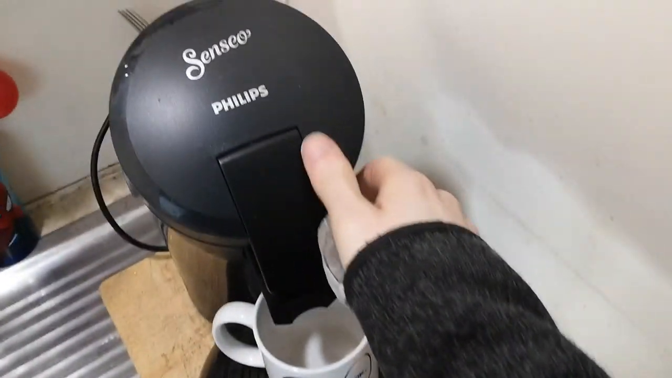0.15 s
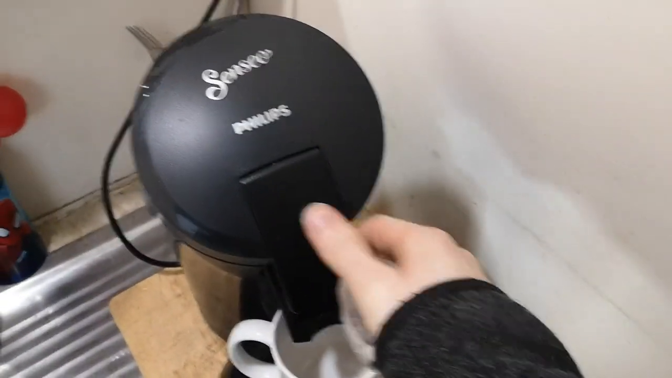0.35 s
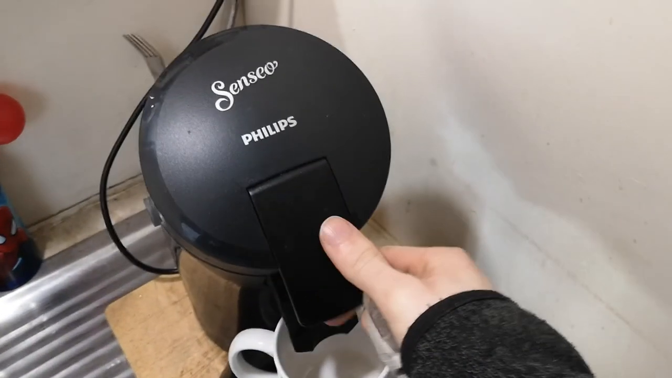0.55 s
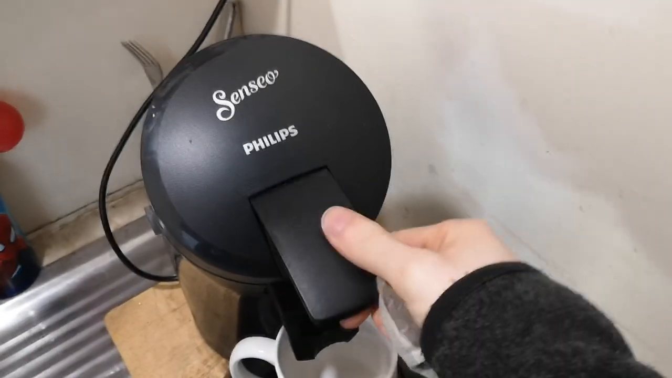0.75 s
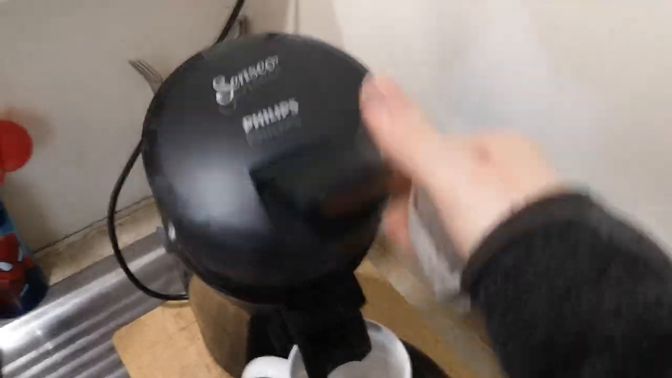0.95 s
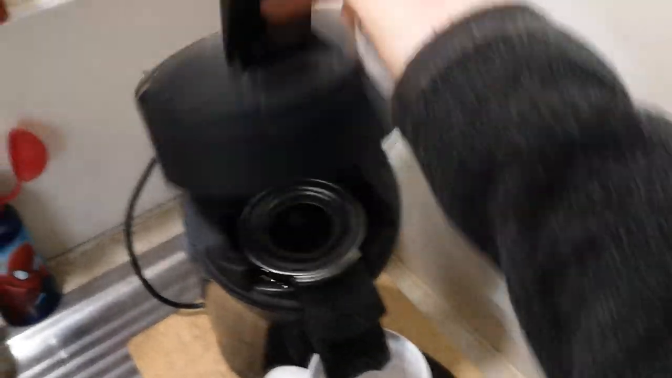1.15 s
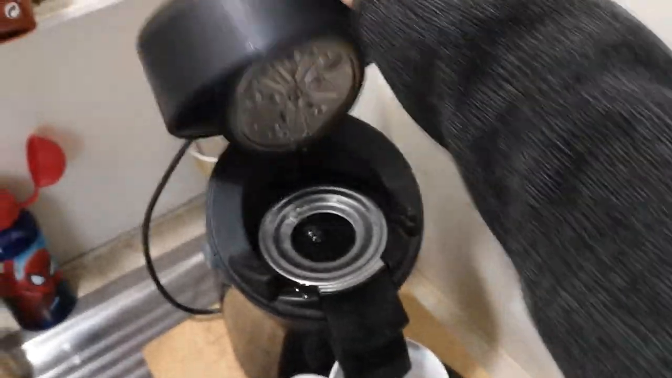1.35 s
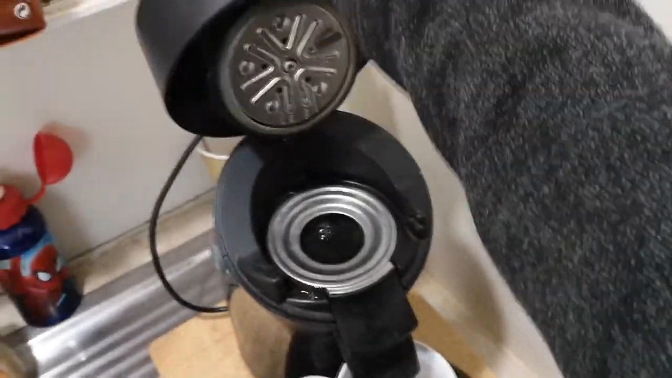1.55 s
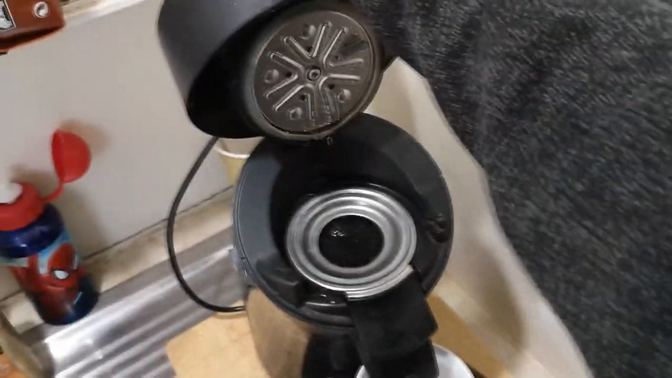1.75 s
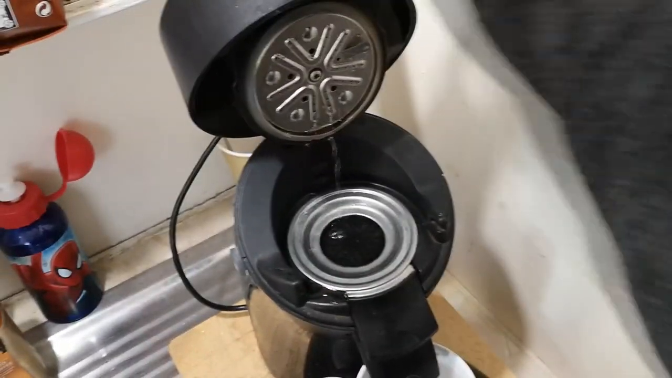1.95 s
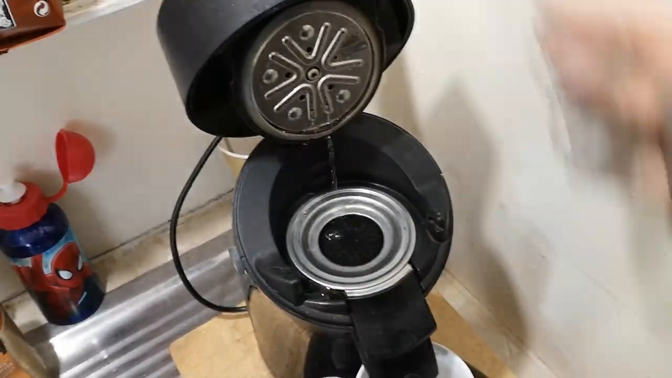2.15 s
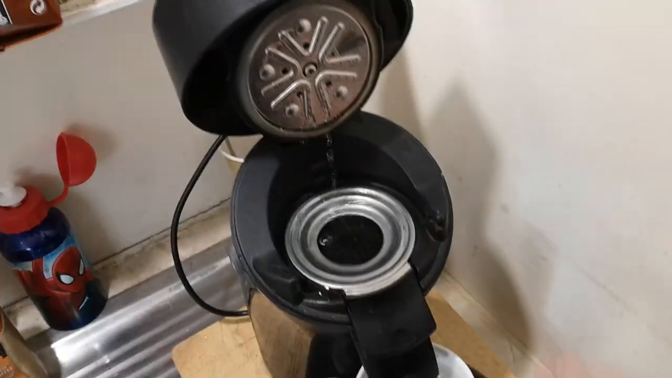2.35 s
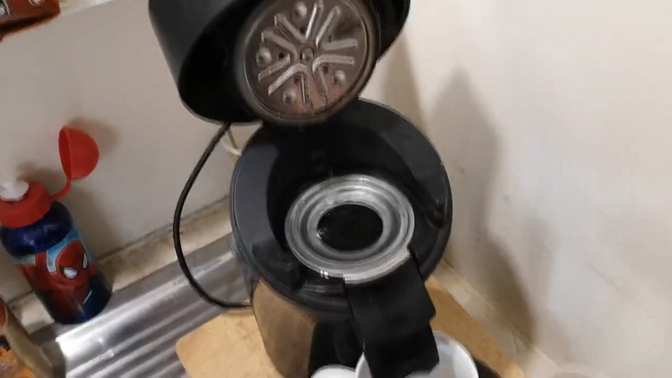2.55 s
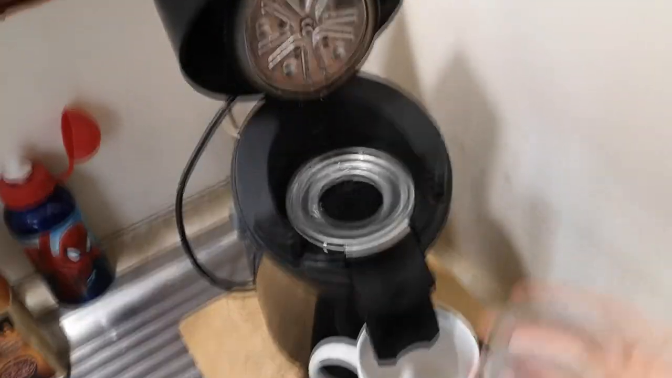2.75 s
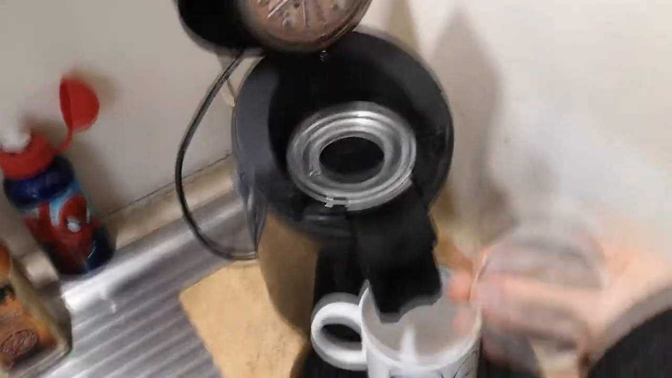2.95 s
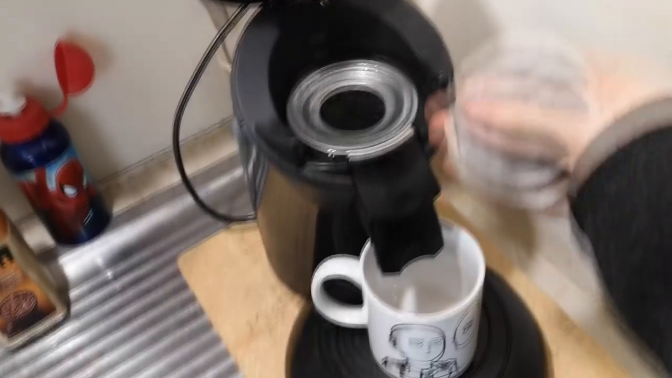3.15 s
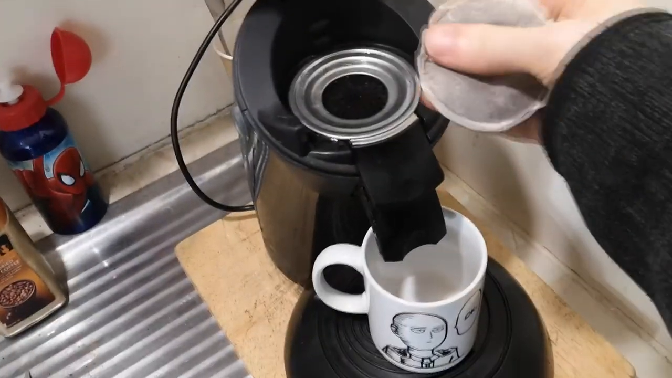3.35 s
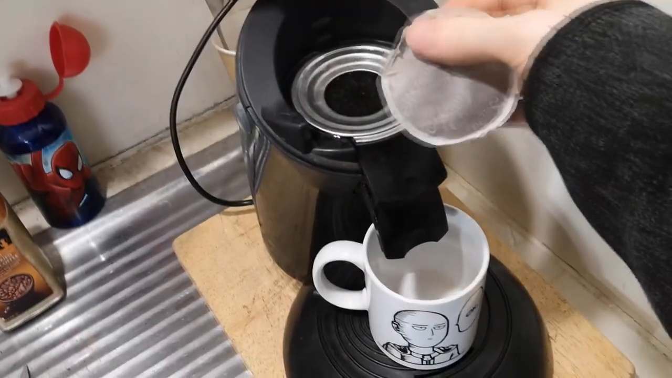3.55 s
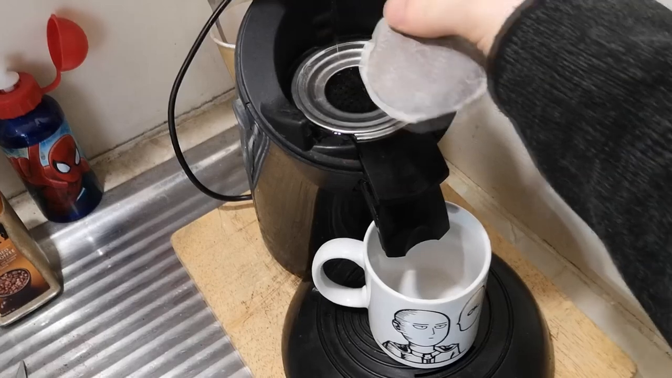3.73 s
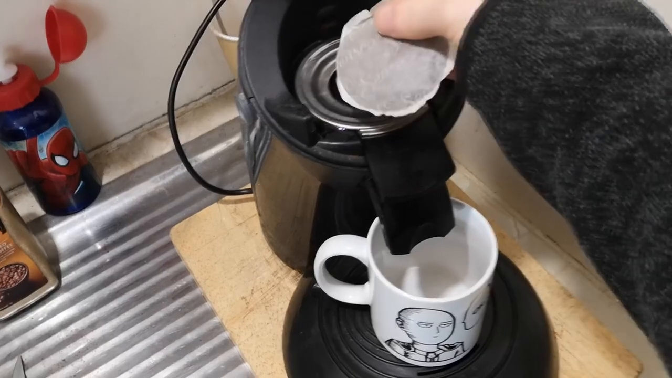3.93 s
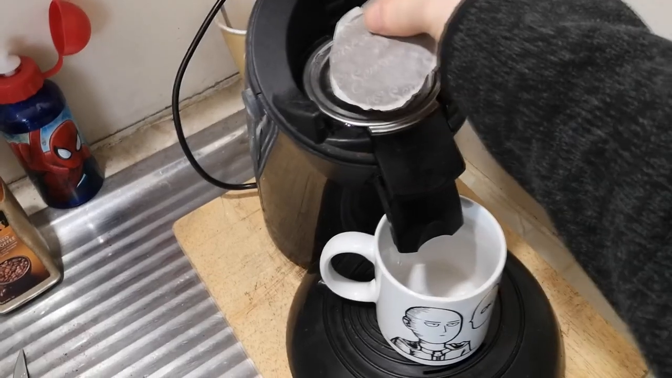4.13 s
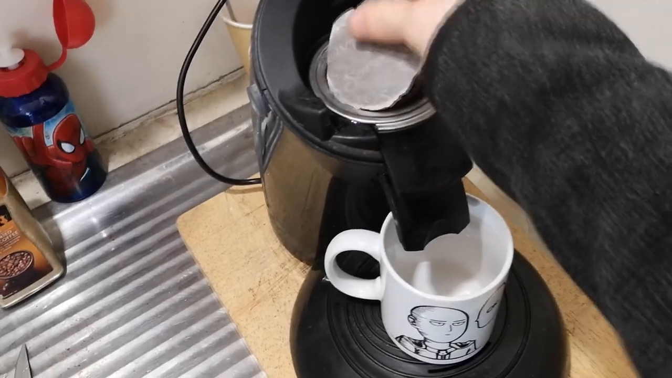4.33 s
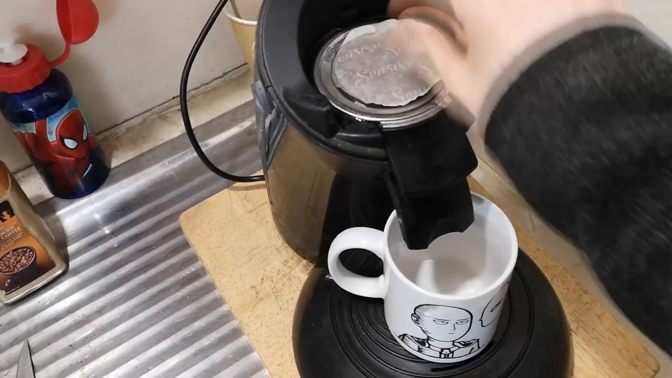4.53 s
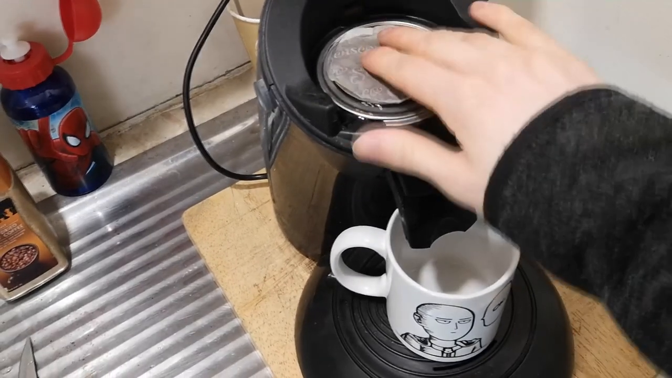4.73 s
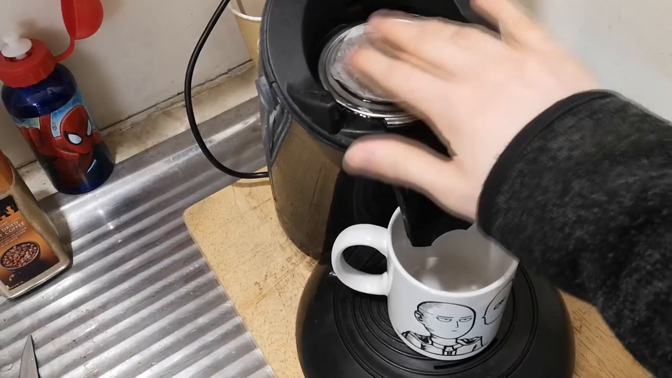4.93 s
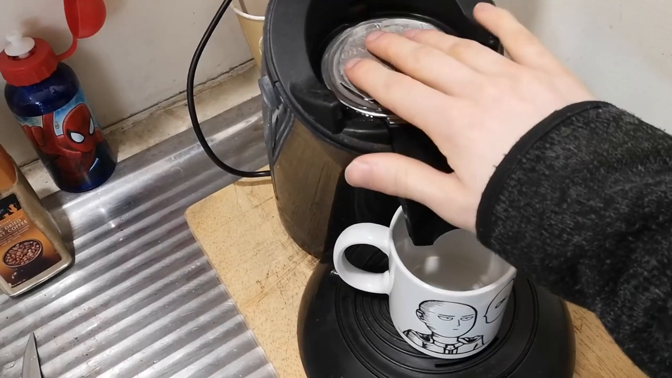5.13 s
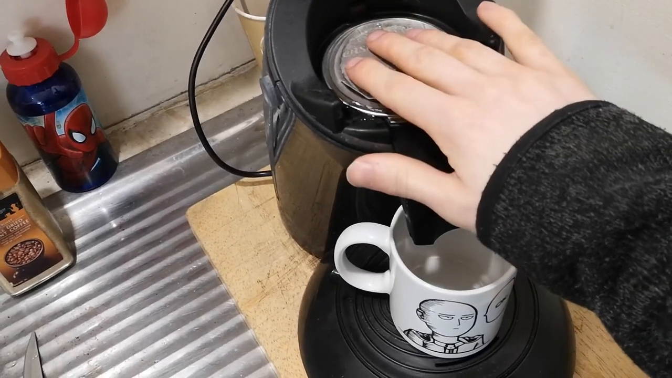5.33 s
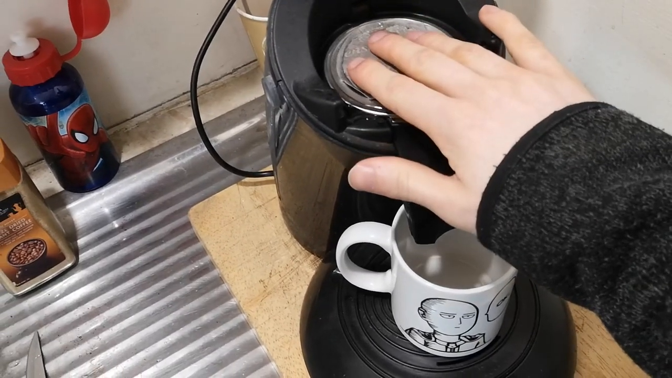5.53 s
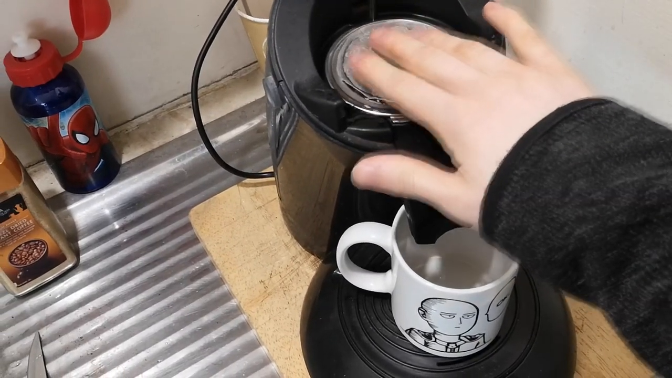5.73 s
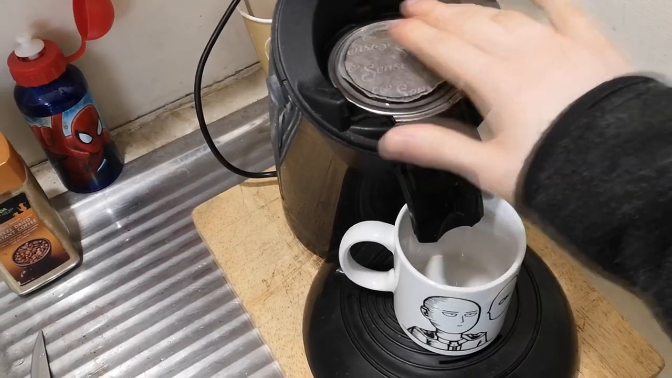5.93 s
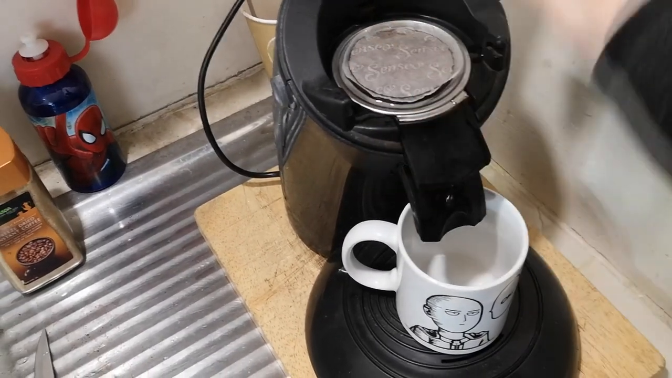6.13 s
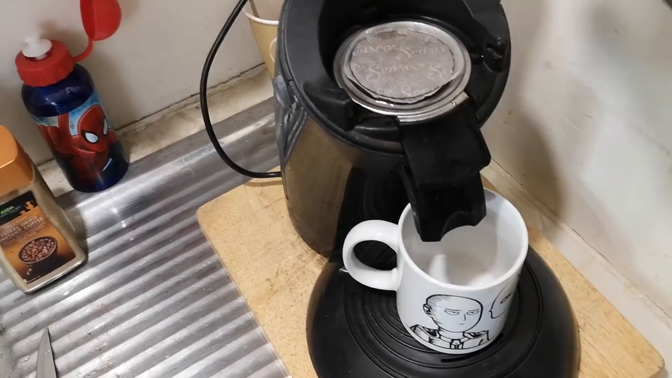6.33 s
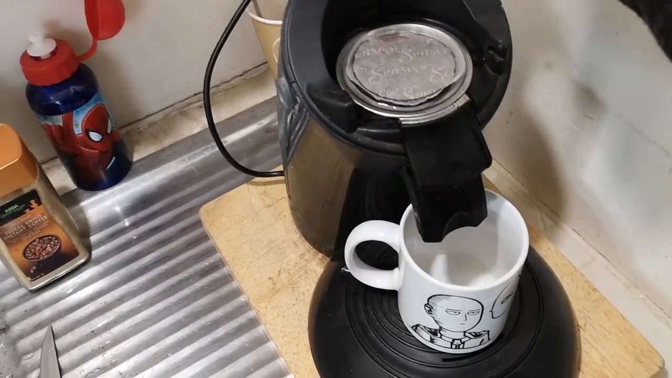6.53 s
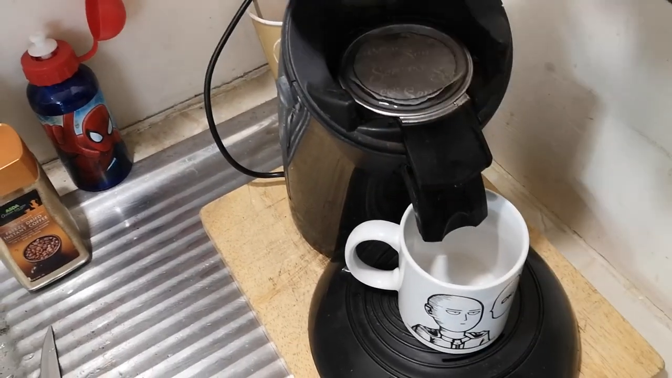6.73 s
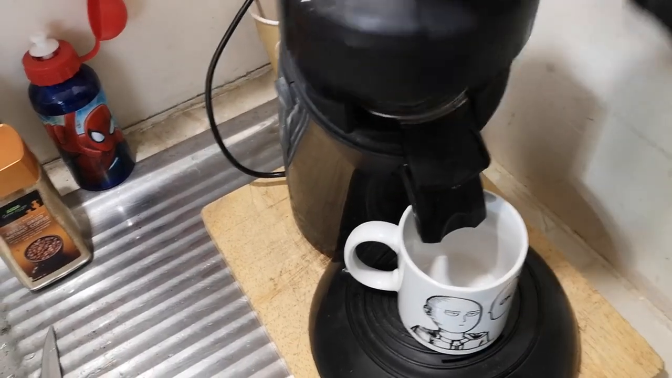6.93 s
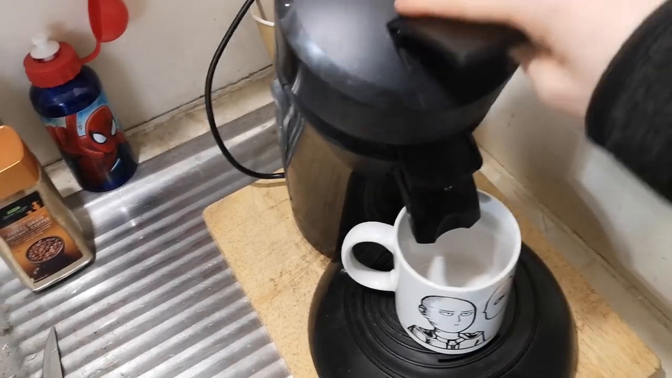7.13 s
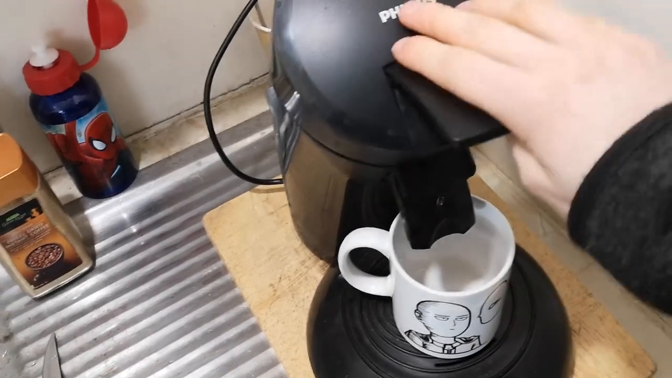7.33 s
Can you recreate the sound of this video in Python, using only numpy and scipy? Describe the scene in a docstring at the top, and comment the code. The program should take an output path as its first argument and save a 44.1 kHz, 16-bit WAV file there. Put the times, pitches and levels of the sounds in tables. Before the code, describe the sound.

Sharp plastic clack and low thump, faint paper rustles, a deep wavering drone, then a rapid run of lid clicks and bumps in a small kitchen.

```python
"""Plastic clicks and low bumps stand over a swelling room noise and a deep wavering drone.
A hand works the lever and lid of a plastic coffee machine in a small kitchen and seats a paper pad.
Clicks are noise bursts ringing in plastic, bumps and drone are sines, creaks a driven resonance,
rustle dense snaps, and the room is random spectra. Of a hand-held pair of microphone ports
the left is nearer and brighter."""
import sys
import numpy as np
from scipy import signal
from scipy.fft import rfft, irfft
from scipy.io import wavfile
from scipy.ndimage import uniform_filter1d

SR = 44100
rng = np.random.default_rng(int(sys.argv[2]) if len(sys.argv) > 2 else 0)


def unload_wav(signal):
    """Save mono or channel-first audio to the path in sys.argv[1] as 16-bit WAV at rate SR, clipped to [-1, 1]."""
    wavfile.write(
        sys.argv[1],
        SR,
        np.round(np.clip(np.atleast_2d(signal).T, -1, 1) * 32767).astype(np.int16),
    )


N = 329868

LAG_S = 0.000591  # the right port hears the middle and treble later
BASS_LAG_S = 0.00016  # the right port's delay for bumps and drone


def gain_of(db):
    """Amplitude factor of a level in dB."""
    return 10 ** (np.asarray(db) / 20)


def evened(x):
    """Scale to an RMS of one."""
    return x / np.sqrt(np.mean(abs(x) ** 2) + 1e-20)


def read(points, hz):
    """Read a curve of (f/Hz, value) points along log frequency."""
    f, value = np.transpose(points)
    return np.interp(np.log(hz + 1), np.log(f + 1), value)


def add(mix, s, sound):
    """Lay a sound into the mix from s seconds on, cut at the end."""
    part = mix[..., round(s * SR):][..., :sound.shape[-1]]
    part += sound[..., :part.shape[-1]]


def bell(hz, centre_hz, width_hz):
    """Resonance curve that peaks at one and is half as high at the edges of its width."""
    return 1 / (1 + (2 * (hz - centre_hz) / width_hz) ** 2)


def late(hz):
    """Phase turn of the right port: deep bass arrives together, the rest later."""
    return np.exp(-2j * np.pi * hz * LAG_S * hz ** 2 / (hz ** 2 + 350 ** 2))


def ported(near, far, hz, pan_db, direct):
    """Spectra at both ports: the right hears the direct part late, the rest by other paths."""
    # how far near sources lean to the left: f/Hz, share of their left-right dB
    lean = [(200, -0.5), (700, .5), (1300, 0.9), (2200, 1.33), (4400, 0.8), (9000, 0.9), (14000, -0.1)]
    shared_hz = 370  # the bass share moves half way to fully direct here, and further below
    direct = np.clip(direct + (1 - direct) * bell(hz, 0, 2 * shared_hz), 0, 1)
    right = direct * near * late(hz) + np.sqrt(1 - direct ** 2) * far
    right = right / gain_of(pan_db * np.clip(read(lean, hz), 0, 1.5))
    return np.array([near, right])


def strokes(rows):
    """Gain of each stroke over the whole scene: a swell up to its loudest moment, then a fade."""
    range_db = 20  # a swell or fade length is the time taken to cover this range
    s, db, swell_s, fade_s = np.transpose(rows)[:4, :, None]
    since = np.arange(N) / SR - s
    return gain_of(db - range_db * np.where(since < 0, -since / swell_s, since / fade_s))


def room_noise(patchy_db=1.0, flicker_db=1.8):
    """Random short-time spectra; rumble, body and hiss swell, the zones between follow the body."""
    # swells of the room noise: t/s, rumble level/dB, body level/dB, hiss level/dB
    swells = [(0.0, -60, -59, -71.5), (0.25, -55.5, -59.5, -70.5), (0.62, -50.5, -58.5, -73),
              (0.82, -45, -47.5, -63), (1.0, -43, -55.5, -69), (1.18, -48, -55.5, -69),
              (1.37, -48.5, -56, -68), (1.85, -49.5, -61, -75), (2.25, -48.5, -57, -67),
              (2.6, -47.5, -55, -72), (2.85, -51.5, -59, -73.5), (3.4, -51.5, -59.5, -71),
              (3.98, -48.5, -59.5, -74.5), (4.3, -44, -54, -71), (4.621, -41.5, -55, -69),
              (4.899, -52.5, -61.5, -76.5), (5.25, -51, -60, -75.5), (5.58, -47, -58, -74.5),
              (5.85, -39.5, -54.5, -70.5), (6.2, -43.5, -56, -66), (6.62, -59, -63, -77.5),
              (6.88, -30.5, -54.5, -63.5), (7.08, -59, -62.5, -77), (7.33, -36, -62, -77.5),
              (7.48, -59, -62.5, -70)]
    # spectrum shape within each zone: f/Hz, density/dB per Hz
    room = [(15, -3), (24, -1.5), (34, -6.5), (52, -4), (70, -6), (125, -17.5), (175, -25), (230, -21),
            (440, -24.5), (500, -31.5), (640, -28), (900, -33.5), (1300, -37), (2000, -34.5), (2700, -37.5),
            (3100, -47.5), (5500, -54.5), (9000, -63.5), (14200, -65), (16000, -80)]
    # resonances of the room noise: f/Hz, width/Hz, level above its spectrum/dB
    hollows = [(79, 15, -5), (100, 11, 4.5), (120, 10, -9), (141, 11, 2), (169, 24, 0), (229, 20.3, 9.5),
               (266, 11, -4.5), (284, 11, 5.5), (358.7, 21, 7.5), (383.3, 19.5, 8), (435, 26, 6),
               (541, 13, 10.5), (688, 16, 5.5), (849, 14, 15.5), (1101, 29, 6), (1282, 16.4, 13.5),
               (1790, 70, 6), (2120, 34, 4), (3516, 67, 11)]
    # brightness of the left port over the right: f/Hz, left-right/dB
    ports = [(100, 0), (380, 0), (700, 4.5), (1290, 6), (2380, 10), (4400, 5), (8120, 2), (15000, -1.5)]
    # likeness of the noise at both ports: f/Hz, correlation
    same_at = [(30, 1), (100, 0.98), (200, 1), (350, 0.85), (700, 0.37), (1500, 0.32), (3500, 0.12),
               (8000, 0.06), (14000, 0.15)]
    hum_db, hum_follows = -56.5, 0.85  # level when the body rests, dB per dB that the body swells
    low_middle_db, low_middle_follows = -68, 0.93
    body_rest_db = -60
    step, size = 512, 4096  # samples
    frames, hz = N // step + 9, np.fft.rfftfreq(size, 1 / SR)
    a, b, c, d, patches = rng.standard_normal((frames, len(hz), 5)).T

    # slow uneven patches over the whole field, quick flicker in the treble
    patches = uniform_filter1d(patches, size=40, axis=0)
    patches = evened(uniform_filter1d(patches, size=6, axis=1))
    flicker = evened(uniform_filter1d(rng.standard_normal(frames), size=2))
    shape_db = read(room, hz) + sum(db * bell(hz, f, w) for f, w, db in hollows)

    s, rumble, body, hiss = np.transpose(swells)
    swell = body - body_rest_db
    hum = hum_db + hum_follows * swell
    low_middle = low_middle_db + low_middle_follows * swell
    levels = [rumble, hum, low_middle, body, hiss]
    t, field_db = np.arange(frames) * step / SR, 0
    edges = [(0, 130), (150, 500), (520, 900), (900, 3000), (4000, 13000)]  # Hz, where each level is set
    knots = np.log([90, 170, 450, 540, 850, 1050, 2800, 5000])  # the zones crossfade between these
    for k, ((lo, hi), db) in enumerate(zip(edges, levels)):
        zone = np.interp(np.log(hz + 1), knots, np.array([0, 1, 1, 2, 2, 3, 3, 4]) == k)
        zone_db = 10 * np.log10(np.sum(gain_of(shape_db[(hz > lo) & (hz < hi)]) ** 2))
        field_db = field_db + zone[:, None] * (np.interp(t, s, db) - zone_db)
    field_db = field_db + shape_db[:, None] + patchy_db * patches
    field_db = field_db + flicker_db * flicker * (hz > 900)[:, None]

    same = np.clip(read(same_at, hz), -1, 1)[:, None]
    left = a + 1j * b
    right = same * left * late(hz)[:, None] + np.sqrt(1 - same ** 2) * (c + 1j * d)
    side = gain_of(read(ports, hz) / 2)[:, None]
    # eight overlapping frames average the power to a third
    z = np.array([left * side, right / side]) * gain_of(field_db) * np.sqrt(3)
    return signal.istft(z, nperseg=size, noverlap=size - step)[1][:, :N]


def drone():
    """Near-pure deep tones that swell, drift and fade."""
    # the deep drone, one table a swell: t/s, f/Hz, RMS level/dB
    deep = [
        [(0.1, 66.4, -62), (0.3, 64.7, -58), (0.5, 61.6, -51), (0.75, 60, -56)],
        [(2.1, 38.3, -60), (2.3, 40.2, -48), (2.39, 40.7, -40), (2.49, 40, -34), (2.64, 44.3, -46),
         (2.79, 45.2, -52)],
        [(3.0, 47, -64), (3.1, 46.3, -42.5), (3.14, 47, -58), (3.2, 47.4, -43), (3.33, 48.4, -53.5),
         (3.46, 48, -55), (3.6, 52, -50)],
        [(3.85, 50.4, -48), (3.97, 45.9, -44.5), (4.11, 41.9, -33.5), (4.18, 41.6, -37), (4.3, 42.7, -29.5),
         (4.42, 41.4, -30), (4.6, 43.1, -31), (4.73, 43, -39), (4.79, 46.4, -64), (4.88, 46.3, -43.5),
         (5.05, 44.9, -55)],
        [(5.42, 54.3, -64), (5.52, 56.5, -39), (5.66, 54, -33), (5.8, 58.2, -34.5), (6.03, 60.5, -28.5),
         (6.12, 61.4, -35.5), (6.17, 61.2, -32), (6.28, 62.6, -44.5), (6.35, 59, -32), (6.42, 62.2, -43),
         (6.49, 62.8, -39), (6.63, 59.7, -45), (6.68, 62.7, -58)],
    ]
    # a second, higher drone, one table a swell: t/s, f/Hz, RMS level/dB
    higher = [
        [(1.95, 99.8, -68), (2.15, 96.3, -52.5), (2.4, 95, -55), (2.6, 94, -58), (2.8, 91.5, -56)],
        [(5.5, 110, -47), (5.69, 103.9, -63), (5.74, 103, -39.5), (5.95, 102.9, -43.5), (6.05, 103.8, -57),
         (6.13, 102.7, -48), (6.18, 103.7, -39), (6.3, 105.1, -56.5), (6.55, 100, -51), (6.7, 100.2, -60)],
    ]
    out = np.zeros(N)
    for rows in list(deep) + list(higher):
        s, hz, db = np.transpose(rows)
        t = np.arange(s[0], s[-1], 1 / SR)
        turns = np.cumsum(np.interp(t, s, hz)) / SR + rng.random()
        tone = np.sqrt(2) * gain_of(np.interp(t, s, db)) * np.sin(2 * np.pi * turns)
        add(out, s[0], tone * signal.windows.tukey(len(t), .08))
    return out


def clicks(width_hz=330, rise_s=0.001298, direct=0.057):
    """A short crack and a dying rustle of reflections, coloured by plastic that rings near one pitch."""
    # plastic clicks: t/s, peak/dB, ring f/Hz, ring strength/dB, nominal shares of body, treble
    # and top/dB, reflections/dB, left-right/dB before the lean
    hits = [(0.356, -41.5, 1580, 6, -29, -24, -47, -12, 9.9),
            (0.549, -27.5, 2170, 12, -39, -33, -51, -13.5, 6.8),
            (0.679, -38.5, 1790, 3.6, 6, -13, -46, 8, 9.7), (0.735, -29, 1650, 5.2, -40, -19, -66, -17, 12),
            (0.758, -36.5, 1860, 9, -28, -24, -49, -15, 11),
            (0.822, -8.5, 1660, 10, -38, -26.5, -43, -9, 11.6),
            (0.838, -15, 2110, 20, -20, -22, -36, -5, 3), (0.845, -23, 1740, 20, -11, -21, -40, -10, 18),
            (0.859, -19, 1790, 12, -35, -21.5, -42, -3, 10), (0.866, -30, 1560, 8, -18, -21, -30, -18, 9),
            (0.882, -24, 1670, 18, -18, -25, -48, -9, 5), (0.899, -34, 900, 12, 20, -26, -46, -3, 2),
            (1.097, -43, 1270, 6, -28, -13.5, -25.5, -7, 9.9),
            (1.217, -33, 2380, 9, -12, -4.5, -14.5, -9.5, 12),
            (1.473, -42.5, 1970, 17, -16, -17, -29, -9, 8),
            (1.508, -36, 2100, 11, -13, -11.5, -23, -23, 11), (2.131, -44, 1850, 9, -15, -11, -18, -15, 10),
            (2.155, -43.5, 1680, 4, 11, -3, -15, -3, 11), (2.213, -47, 1820, 13, -9, -6, -14, -17, 7),
            (2.43, -49, 1840, 7, -22, -17, -15, -19, 4), (2.517, -49, 2190, 9, -16, -14, -18, -16, 7),
            (2.565, -36, 2350, 12, -35, -3, -22, -18, 8.9),
            (2.641, -33.5, 1260, 20, -27, -23, -34, -4, 4.7),
            (2.655, -41, 1865, 2.3333, -34, -15, -39, 0, 5), (2.869, -42, 2110, 4, -34, -12, -17, -11, 7),
            (2.99, -50, 1740, 5, -20, -12, -25, -13, 4), (3.259, -46, 1880, 17, -34, -17, -32, -15, 7),
            (3.407, -43, 1790, 13, -16, -15, -23, -7, 12), (3.812, -51, 1610, 12, -24, -4, -16, -18, 7),
            (4.397, -26.5, 1890, 27, -38, -37, -51, 0, 13), (4.72, -40, 2150, 7.8, -31, -28, -44, -4, 6.5),
            (4.987, -48.5, 1720, 19, -23, -15, -29, -16, 5), (5.133, -41, 1880, 9, -30, -36, -46, -5, 9.2),
            (5.268, -51, 1690, 11, -13, -11, -26, -22, 3), (6.425, -43, 1500, 7, -31, -21, -41, 4, 4.6),
            (6.499, -27, 2474, 13, -31, -8, -27.5, -8, 8.8),
            (6.523, -25, 2320, 5.6, -27, -25, -57, -21, 16),
            (6.526, -29.5, 1590, 7.6, -24, -23, -34, -3, 3.7),
            (6.556, -24.5, 2280, 7.6, -22, -9.5, -19.5, -13.5, 9.6),
            (6.572, -36.5, 2120, 12, -12, -15, -24, -8, 1.3333),
            (6.749, -24.5, 1565, 31, -28, -30, -44, -7, 6.5),
            (6.771, -30.5, 2170, 14, -17, -15, -36, -7, 6.7),
            (6.814, -42.5, 1100, 17, -17, -12, -23, -11, 4), (6.846, -43.5, 1810, 9, -9, 4, -5, -5, 10),
            (6.875, -36, 1340, 10, -16, -17, -36, -23, 8.2), (6.881, -34.5, 1180, 5, -18, -15, -49, -1, 10),
            (7.273, -42, 1510, 7, -5, -21, -36, -1, 5), (7.291, -41, 1810, 10, -24, -20.5, -60, 0, 12),
            (7.322, -39, 2030, 9.2, -35, -26, -42, -12, 7.3),
            (7.339, -35.5, 1970, 18, -21, -18, -31, -9, 10), (7.375, -42, 1080, 6.4, -15, -15, -28, -11, 5),
            (7.393, -23.5, 2330, 16.3, -41, -5.5, -14.5, -16, 8.2)]
    # colour of the plastic before ring and shares: f/Hz, density/dB per Hz
    plastic = [(180, -11.5), (300, -2.5), (455, -8), (667, -4.5), (900, -4), (2570, -5.5), (3290, -8),
               (5800, -7), (10200, -23), (14700, -35), (16000, -61)]
    blow_s, reflections_t60_s = 0.002, 0.13
    out, t = np.zeros((2, N)), np.arange(8192) / SR
    hz = np.fft.rfftfreq(8192, 1 / SR)
    edges = [(500, 1000), (3300, 8000), (8000, 15000)]  # Hz: body, treble, top
    zones = [np.interp(hz, [830, 1540], [1.015, 0.47]),
             np.interp(hz, [2460, 2950, 6430, 9000], [0, 0.3, 1.49, -0.5]),
             np.interp(hz, [7060, 8870], [0, 1.39])]
    rise = 1 - np.exp(-t / rise_s)
    blow = rise * np.exp(-t / blow_s)
    for s, db, ring_hz, ring_db, *shares_db, tail_db, pan_db in hits:
        near, far = rng.standard_normal((2, len(t)))
        tail = rise * gain_of(tail_db - 60 * t / reflections_t60_s)
        ring = ring_db * bell(hz, ring_hz, width_hz)
        unring = gain_of(-.5 * ring)  # the reflections carry less of the ring
        near, far = (rfft(v * blow) + rfft(v * tail) * unring for v in (near, far))

        colour_db = read(plastic, hz) + ring
        power = gain_of(colour_db) ** 2
        for (lo, hi), zone, share_db in zip(edges, zones, shares_db):  # steer each zone's share of power
            now_db = 10 * np.log10(power[(hz > lo) & (hz < hi)].sum() / power.sum())
            colour_db += zone * (share_db - now_db)
        fold = irfft(np.log(gain_of(np.maximum(colour_db, -100))))  # causal phase from the log gain
        fold[1:4096] *= 2
        fold[4097:] = 0
        pair = irfft(ported(near, far, hz, pan_db, direct) * np.exp(rfft(fold)))
        pair = pair * np.cos(np.pi / 2 * t / t[-1])
        add(out, s - rise_s, gain_of(db) * pair / abs(pair.mean(0)).max())
    return out


def bumps(rise_s=0.017):
    """A soft push sets the worktop swinging and the hollow casing booming."""
    # low bumps through the worktop: t/s, swing level before rise and decay/dB, swing f/Hz,
    # casing boom against swing/dB, t60/s
    pushes = [(0.68, -49.5, 63.4, 8, 0.17), (0.819, -18.5, 56.8, -9.5, 0.37), (0.848, -18, 59.7, -38, 0.31),
              (0.876, -19.5, 47.3, -18, 0.35), (0.929, -11.5, 48, -33.5, 0.17), (1.027, -34, 49, -11, 0.18),
              (1.208, -34, 38.8, -16.5, 0.64), (1.58, -33, 49.3, -23, 0.48), (5.116, -35.5, 53, -21, 0.46),
              (5.329, -30, 57.7, -25, 0.31), (6.754, -20, 50.9, -28, 0.28), (6.778, -22.5, 39, -18.5, 0.16),
              (6.859, -20, 37.2, -20, 0.31), (6.879, -30, 45, -6.5, 0.33), (6.939, -22, 64.6, -20, 0.16),
              (7.091, -33, 52.2, -14, 0.27), (7.279, -21.5, 54.8, -28, 0.24),
              (7.33, -29.5, 45.4, -21, 0.26), (7.389, -19, 47.3, -36, 0.11)]
    # modes of the hollow casing: f/Hz, width before the damping factor/Hz, level/dB
    casing = [(147, 13.2, -2), (226, 20, 4.5), (259, 31, 2.5), (290.7, 6.9, -13), (401.4, 23, -2)]
    damping = .6  # of the listed widths
    out, t = np.zeros(N), np.arange(SR // 2) / SR
    for s, db, hz, boom_db, t60 in pushes:
        turn = rng.random(len(casing))
        swing = np.sin(2 * np.pi * hz * t) * gain_of(-60 * t / max(t60, .03))
        swing = swing * (1 - np.exp(-t / rise_s))
        boom = 0
        for (f, w, mode_db), start in zip(casing, turn):
            mode = np.sin(2 * np.pi * (f * t + start)) * np.exp(-np.pi * damping * w * t)
            boom = boom + gain_of(mode_db) * mode
        boom = boom * (1 - np.exp(-t / 0.0073))
        add(out, s, gain_of(db) * (swing + gain_of(boom_db) * boom))
    return out


def creaks(width_hz=200, slips_per_s=900, pan_db=10.0, direct=0.46):
    """Rough slipping drives one resonance whose pitch moves with the pressure."""
    # lever and hinge creaks: loudest t/s, level/dB, swell/s, fade/s, squeak f/Hz, glide/Hz per s
    squeaks = [(0.74, -42.5, 0.13, 0.095, 1840, 304), (0.818, -28, 0.034, .004, 1730, -1000),
               (1.278, -43.5, 0.023, 0.04, 1450, 4000), (1.322, -46.5, 0.028, 0.019, 1680, 200),
               (1.61, -47, 0.036, 0.083, 1700, 1500)]
    gains, (s, _, _, _, squeak_hz, glide) = strokes(squeaks), np.transpose(squeaks)
    gain, k = gains.max(0), gains.argmax(0)  # the loudest stroke sets the pitch
    hz = squeak_hz[k] + glide[k] * np.clip(np.arange(N) / SR - s[k], -.1, .1)
    turn, r = np.exp(2j * np.pi * np.cumsum(hz) / SR), np.exp(-np.pi * width_hz / SR)
    slips = rng.standard_normal((2, N)) * (rng.random(N) < slips_per_s / SR)
    slips = slips / turn  # shift the moving pitch to zero, smooth twice, shift back
    for _ in range(2):
        slips = signal.lfilter([1 - r], [1, -r], slips)
    near, far = rfft(gain * np.sqrt(2) * (turn * evened(slips)).real)
    return irfft(ported(near, far, np.fft.rfftfreq(N, 1 / SR), pan_db, direct), N)


def rustle(grit_db=4.0, snaps_per_s=2500, hiss=0.29, pan_db=5.5, direct=0.08):
    """Dense small snaps of uneven size over a soft hiss."""
    # sleeve and paper strokes: loudest t/s, level/dB, swell/s, fade/s
    rubs = [(1.216, -58.5, 0.0054, 0.18), (1.506, -54, 0.011, 0.037), (2.08, -66, 0.038, 0.075),
            (2.158, -73, .008, .2), (2.567, -41.5, 0.028, 0.028), (2.635, -51.5, 0.18, 0.054),
            (2.878, -54.5, 0.033, .035), (3.408, -55.5, 0.016, 0.075), (4.415, -53.5, 0.041, 0.13),
            (4.4, -65, .5, 0.46), (4.726, -62, 0.16, 0.023), (6.78, -63, .005, .03),
            (6.922, -59.5, 0.043, .1), (7.3, -70, 0.073, 0.086)]
    # colour of sleeve and paper: f/Hz, density/dB per Hz
    paper = [(880, -25), (1500, -13.5), (2320, 0.5), (2510, -11), (4460, -7.5), (11900, -23.5),
             (14900, -33), (16000, -48)]
    hz = np.fft.rfftfreq(N, 1 / SR)
    sizes = gain_of(grit_db * np.minimum(rng.exponential(1, (2, N)), 5))
    snaps = (rng.random((2, N)) < snaps_per_s / SR) * sizes
    snaps = evened(snaps * rng.choice([-1, 1], (2, N)))
    near, far = rfft(snaps + hiss * rng.standard_normal((2, N)))
    pair = irfft(ported(near, far, hz, pan_db, direct) * gain_of(read(paper, hz)), N)
    return strokes(rubs).max(0) * pair / np.std(pair.mean(0))


def scene():
    """Sum of all layers; bumps and drone reach the right port slightly later."""
    bass, hz = bumps() + drone(), np.fft.rfftfreq(N, 1 / SR)
    bass_right = irfft(rfft(bass) * np.exp(-2j * np.pi * hz * BASS_LAG_S), N)
    return room_noise() + clicks() + creaks() + rustle() + np.array([bass, bass_right])


def record(dry):
    """Steep band limit at 16 kHz."""
    lowpass = signal.firwin(511, 16000, window=("kaiser", 9), fs=SR)
    return signal.oaconvolve(dry, lowpass[None], "same")


dry = scene()
out = record(dry)
unload_wav(out)
```